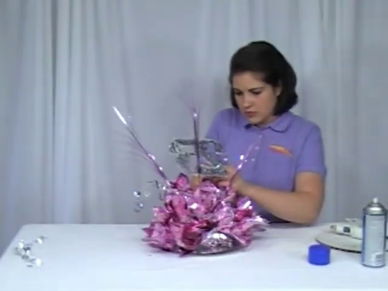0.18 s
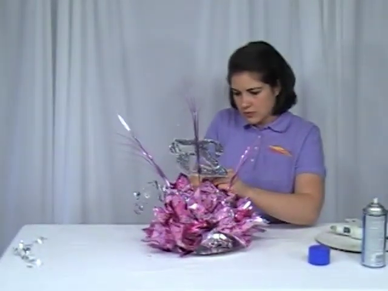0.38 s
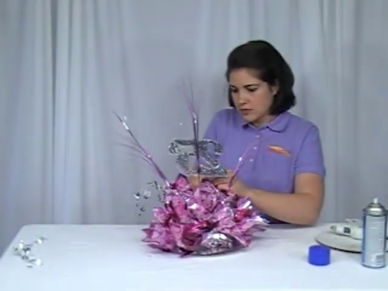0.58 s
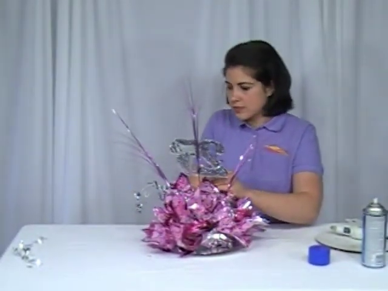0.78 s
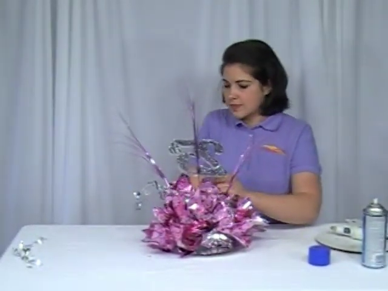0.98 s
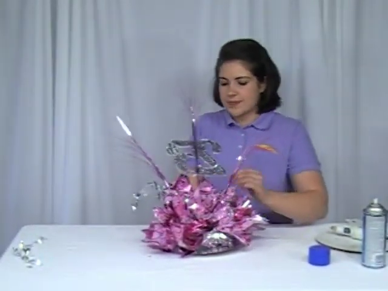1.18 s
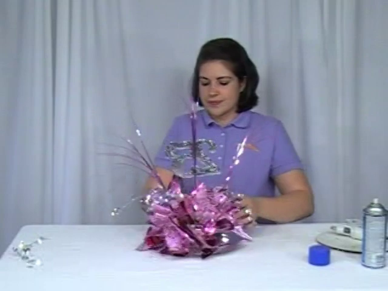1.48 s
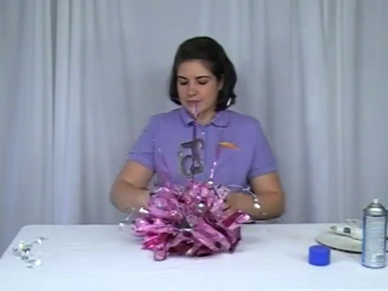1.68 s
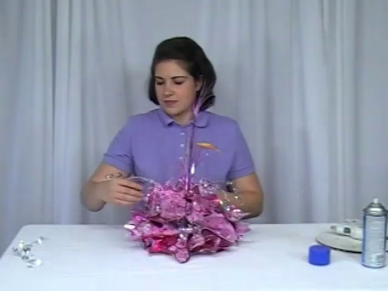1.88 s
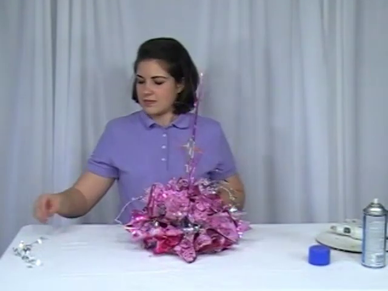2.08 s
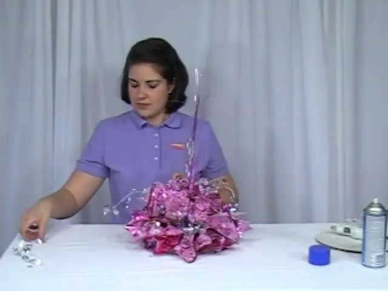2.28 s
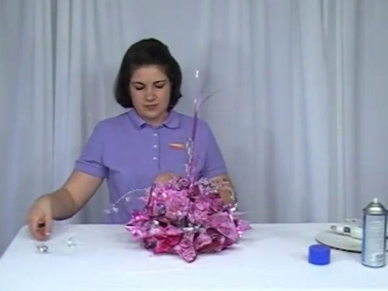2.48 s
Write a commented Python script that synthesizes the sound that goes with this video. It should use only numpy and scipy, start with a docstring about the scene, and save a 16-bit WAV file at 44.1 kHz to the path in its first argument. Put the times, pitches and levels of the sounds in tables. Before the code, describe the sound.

Foil and tinsel crinkle over soft room hiss: sharp snaps early, then scattered crackles, a dense bright burst midway, continued rustling, and finally a soft hand thump and tiny tick, heard in a live room.

```python
"""A faint foil rustle over a soft, wide background hiss of air and microphone comes first, then sprigs snap.
Hands work stiff tinsel sprigs into a foil centerpiece and turn it on a table: decaying cosine grains crinkle,
and larger creases pop as short pings with a sharp edge. Snaps are noise cracks over the damped modes of the base.
A hand then lands softly on the table and picks at a small ornament; both are sums of damped modes.
A live room adds near-wall echoes and a diffuse tail to every handled sound; faint ventilation tones run below."""
import sys
import numpy as np
from scipy import signal
from scipy.fft import rfft, irfft, next_fast_len
from scipy.io import wavfile
from scipy.ndimage import uniform_filter1d

SR = 44100
rng = np.random.default_rng(int(sys.argv[2]) if len(sys.argv) > 2 else 0)


def bounce(signal):
    """Save signal as a 16-bit WAV file at the path given by the first command-line argument."""
    frames = np.transpose(np.atleast_2d(signal))
    limited = np.clip(frames, -1, 1)
    pcm = np.round(limited * 32767).astype(np.int16)
    wavfile.write(sys.argv[1], SR, pcm)


N = 114660  # 2.6 s

# Background noise spectrum: frequency_hz, level_db
BACKGROUND_SPECTRUM = [(20, -21), (60, -15), (120, -14.5), (190, -6), (240, -4), (320, -5), (500, -3),
                       (1000, -7), (1400, -11), (4000, -21.5), (8000, -28), (12500, -33)]
# Stereo width of the background noise: frequency_hz, side_minus_mid_db
BACKGROUND_WIDTH = [(60, 5), (200, 8.5), (450, 9.5), (800, 3), (1500, 13), (4000, 28), (8000, 20)]
# Narrow ventilation tones: frequency_hz, level_db
VENT_TONES = [(241, -69.5), (961, -81), (1080, -70)]
BACKGROUND_DB = -53

# Reverberation time: frequency_hz, t60_s
ROOM_T60 = [(150, 0.4), (400, 0.97), (1500, 0.79), (4000, 0.91), (8000, 0.69), (12000, 0.76)]
# Stereo width of the room's answer: frequency_hz, side_minus_mid_db
ROOM_WIDTH = [(100, 3.5), (300, -5), (600, -6.5), (1000, -11), (1800, -24), (3500, -13), (5500, -14),
              (7000, -8.5), (8500, 0), (9800, -2), (12000, -7)]
# Channel balance of the whole scene: frequency_hz, right_minus_left_db
BALANCE = [(100, 1), (300, 1), (700, 0.5), (2500, 0), (5000, 0.5), (8000, 1.6), (12000, -0.5)]
# Tail and wall levels before each source's own wet level; build-up time constant of the tail
TAIL_DB, WALLS_DB, BUILD_S = 2, -3.5, 0.00033
TOP_HZ = 12550

# Touches of the small ornament, which then settles: start_s, level_db
TICKS = [(2.411, -31.5), (2.429, -40.5)]
# Modes of the ornament: frequency_hz, level_db, t60_s
ORNAMENT_MODES = [(1570, 1.5, 0.011), (1880, -8.5, 0.011), (5370, 9, 0.0026), (8040, 10, 0.0029),
                  (8700, 3.5, 0.0025)]
# The hand landing on the table, heel first, then palm and fingers: start_s, level_db
KNOCKS = [(2.229, -32.5), (2.239, -27), (2.279, -37.5)]
# Modes of the table: frequency_hz, level_db, t60_s
TABLE_MODES = [(103, -15.5, 0.11), (157, -11, 0.07), (217, -4.5, 0.05), (257, -1.5, 0.063),
               (288, 2.5, 0.044), (361, -1.5, 0.054), (451, -7, 0.045), (740, -6, 0.034), (1044, -9, 0.03)]

# Single large creases flipping: start_s, level_db, pitch_hz
POPS = [(0.0602, -41, 2430), (.161, -39, 8100), (0.4336, -39, 6240), (0.5058, -41, 6500),
        (0.5495, -40, 7200), (0.638, -34, 7750), (0.6405, -36, 7030), (.767, -30, 5630), (.782, -43, 7700),
        (.817, -37, 7700), (.846, -29, 5350), (0.876, -32, 1790), (0.9171, -24, 8200), (1.005, -34.5, 1940),
        (1.1573, -37.5, 6060), (1.2936, -32, 6900), (1.319, -30, 7800), (1.342, -22, 7200),
        (1.3602, -23.5, 6100), (1.3745, -21.5, 8200), (1.39, -21.5, 8500), (1.3915, -28.5, 1270),
        (1.4006, -25.5, 7140), (1.4092, -28.5, 6800), (1.4353, -23, 6900), (1.447, -28, 1990),
        (1.4614, -24.5, 6900), (1.5012, -22, 6850), (1.5632, -26.5, 7700), (1.6904, -29, 7760),
        (1.7955, -27.5, 1940), (1.812, -27, 2070), (1.903, -29, 2390), (1.9222, -28.5, 1870),
        (2.0655, -32.5, 5360), (2.1186, -32.5, 7340), (2.1259, -36.5, 5450)]
POP_CYCLES, POP_CRACK_DB = 2.13, 0  # cycles to decay by 1/e; edge level relative to the ping
POP_TILT_DB, POP_MID_HZ = 2, 5000  # edge tilt per octave of pitch; pitch with an untilted edge

# Sprigs snapping into the base, some in several quick contacts, and a nudge of the base at 1.83 s:
# start_s, crack_db, tilt_db_per_octave, thump_db
SNAPS = [(0.2344, -19, -1.5, -33), (0.236, -18, 2.5, -34), (0.2451, -24, -3, -36), (0.258, -26, -2, -35),
         (0.7702, -22.5, -1.4, -37.5), (0.9068, -17.5, 0.4, -35), (1.8289, -27.5, -2, -41),
         (2.1152, -28.5, -2.5, -54)]
# Modes of the base: frequency_hz, level_db, t60_s
BASE_MODES = [(183.8, 0.5, 0.37), (241.7, 7, 0.2), (277, 11, 0.094), (376.6, 7.5, 0.12), (419.7, 2, 0.33),
              (692, 0, 0.21)]
# Crack spectrum before tilt: frequency_hz, level_db
CRACK_SPECTRUM = [(20, -69), (100, -25), (300, -12), (900, -6), (1600, -0.5), (2600, 3.5), (3900, -1.5),
                  (5600, 1.5), (8200, 5), (10500, -5.5), (12500, -12)]
SNAP_DECAY_S = 0.0039

# Strength of handling over time: start_s, tinsel_level_db, leaves_level_db
HANDLING = [(0, -50, -52), (.16, -55, -55), (.22, -58, -63), (0.252, -33, -49), (.33, -57, -41.5),
            (.39, -87, -59.5), (.5, -56, -56), (0.539, -44, -50), (.63, -47.5, -56.5), (.68, -72, -56.5),
            (.76, -47, -57), (.78, -42.5, -49), (.84, -43, -49.5), (.88, -40, -45.5), (.97, -52, -50),
            (1.01, -39, -43), (1.05, -48.5, -55), (1.19, -55, -55), (1.3, -45.5, -52), (1.348, -33, -42),
            (1.45, -38.5, -47), (1.54, -40.5, -44), (1.65, -40, -44), (1.75, -37, -42), (1.78, -39.5, -43),
            (1.84, -34, -44.5), (1.88, -47, -47.5), (1.919, -40.5, -44.5), (1.96, -49.5, -65),
            (2.05, -41, -49.5), (2.1, -60, -54.5), (2.181, -54.5, -57), (2.33, -58.5, -56.5),
            (2.6, -62, -62.5)]
# Colour of the bright tinsel: frequency_hz, level_db
TINSEL_SPECTRUM = [(200, -26), (1500, -8), (3500, -10), (5000, -5.5), (6500, -2.5), (7800, -1.4),
                   (9200, -8), (10800, -16), (12500, -11.5)]
# Colour of the duller foil leaves: frequency_hz, level_db
LEAVES_SPECTRUM = [(80, -23.5), (250, -11.5), (500, -9.5), (800, -5), (1450, -3.5), (1950, -2.5),
                   (2800, -6.5), (4000, -12), (9000, -21.5)]
CREASES_PER_S, CREASE_SPREAD_DB, CREASE_DECAY_S = 900, 4.5, 0.00022
FLURRIES_PER_S, FLURRY_DB = 80, 3  # each flurry is raised or lowered by up to FLURRY_DB


def amp(db):
    """Level law: decibels to an amplitude gain."""
    return 10 ** (np.asarray(db) / 20)


def unit(x):
    """Power normalization: scale to rms 1."""
    return x / np.sqrt(np.mean(x ** 2) + 1e-20)


def blow(x):
    """Energy normalization: give a short sound the energy of a one-millisecond burst of rms 1."""
    return x * np.sqrt(SR / 1000 / np.sum(x ** 2))


def along(points, hz):
    """Logarithmic frequency scale: interpolate (Hz, value) points at the given frequencies."""
    point_hz, values = np.transpose(points)
    return np.interp(np.log(hz + 1), np.log(point_hz + 1), values)


def filtered(x, response):
    """Linear filtering: multiply the spectrum by a response of frequency."""
    length = next_fast_len(x.shape[-1] + SR // 4)
    spectrum = rfft(x, length) * response(np.fft.rfftfreq(length, 1 / SR))
    return irfft(spectrum, length)[..., :x.shape[-1]]


def coloured(x, points, tilt_db=0, size=2048):
    """Minimum phase: a folded cepstrum makes a causal filter from (Hz, dB) points and a tilt per octave."""
    hz = np.fft.rfftfreq(size, 1 / SR)
    level_db = along(points, hz) + tilt_db * np.log2(hz + 20)
    cepstrum = irfft(np.log(amp(level_db)))
    cepstrum[1:size // 2] *= 2
    cepstrum[size // 2 + 1:] = 0
    impulse = irfft(np.exp(rfft(cepstrum)))
    return signal.fftconvolve(x, impulse)[:len(x)]


def widened(pair, width):
    """Diffuse field: two unrelated signals serve as mid and side of a stereo pair."""
    def mid_side_gains(hz):
        angle = np.arctan(amp(along(width, hz)))
        return np.array([np.cos(angle), np.sin(angle)])

    mid, side = filtered(pair, mid_side_gains)
    return np.array([mid + side, mid - side])


def add(track, start_s, x):
    """Superposition: mix x into the track from the given time."""
    part = track[..., round(start_s * SR):][..., :x.shape[-1]]
    part += x[..., :part.shape[-1]]


def even(x, size=2200):
    """Running power normalization: steady the level over about 50 ms so that single crackles stand out."""
    return x / np.sqrt(np.abs(uniform_filter1d(x ** 2, size)) + 1e-20)


def ring(modes, radiate_hz=150, attack_s=0.0016):
    """Modal vibration: one blow excites damped modes, and the deepest bass is radiated poorly."""
    t = np.arange(SR // 3) / SR
    modal_sum = sum(amp(db - 60 * t / t60_s) * np.sin(2 * np.pi * hz * t) for hz, db, t60_s in modes)
    struck = modal_sum * (1 - np.exp(-t / attack_s))
    radiation = signal.butter(2, radiate_hz, "high", fs=SR, output="sos")
    return blow(signal.sosfilt(radiation, struck))


def crack(tilt_db, splinter_db=-19):
    """Impulsive fracture: one sharp pulse with a short, decaying noise tail."""
    t = np.arange(SR // 20) / SR
    burst = amp(splinter_db) * rng.standard_normal(len(t)) * np.exp(-t / SNAP_DECAY_S)
    burst[0] = 1
    return blow(coloured(burst, CRACK_SPECTRUM, tilt_db))


def diffuse_tail():
    """Reverberant decay: two channels of noise lose 60 dB in the t60 of each frequency."""
    noise = rng.standard_normal((2, SR * 3 // 4))
    hz, frame_s, spectrum = signal.stft(noise, SR, nperseg=256)
    decay = amp(-60 * frame_s / along(ROOM_T60, hz)[:, None])
    tail = signal.istft(spectrum * decay, SR, nperseg=256)[1]
    t = np.arange(tail.shape[1]) / SR
    return tail * (1 - np.exp(-t / BUILD_S))


def room(x, wet_db=0, count=16):
    """Room impulse response: direct sound, near-wall echoes at 2 to 24 ms and a diffuse tail."""
    tail = diffuse_tail()
    walls = np.zeros_like(tail)
    for channel in walls:
        delay_s = .002 + .022 * rng.random(count)
        channel[(SR * delay_s).astype(int)] = rng.choice([-1, 1], count) / np.sqrt(count)
    reflections = amp(TAIL_DB) * tail / np.linalg.norm(tail[0]) + amp(WALLS_DB) * walls
    answer = amp(wet_db) * widened(reflections, ROOM_WIDTH)
    answer[:, 0] += 1  # direct sound
    return signal.fftconvolve(x[None], answer / np.linalg.norm(answer[0]), axes=1)


def moving(x, count=26):
    """Changing echo paths: as the piece shifts and turns, each tenth of a second gets a new room response."""
    out, hop = np.zeros((2, N)), N // count
    for start in range(0, N, hop):
        add(out, start / SR, room(x[start:start + hop], wet_db=-1.5))
    return out


def vent_tone(hz, width_hz=6):
    """Narrow-band resonance: noise through a narrow peak wavers around one pitch."""
    return unit(filtered(rng.standard_normal(N), lambda f: 1 / (1 + ((f - hz) / width_hz) ** 2)))


def background():
    """Stationary noise: steady, wide background noise with a few narrow ventilation tones in the middle."""
    noise = filtered(rng.standard_normal((2, N)), lambda hz: amp(along(BACKGROUND_SPECTRUM, hz)))
    hiss = unit(widened(noise, BACKGROUND_WIDTH))
    tones = sum(amp(db) * vent_tone(hz) for hz, db in VENT_TONES)
    return amp(BACKGROUND_DB) * hiss + tones


def ornament_ticks():
    """Small-body resonance: fingers excite the ornament's high, strongly damped modes."""
    out = np.zeros((2, N))
    for start_s, level_db in TICKS:
        tick = amp(level_db) * ring(ORNAMENT_MODES, attack_s=0.00023)
        add(out, start_s, room(tick, wet_db=-0.5))
    return out


def knocks():
    """Damped panel modes: the hand meets the cloth-covered table in dull thumps that fade in the room."""
    out = np.zeros((2, N))
    for start_s, level_db in KNOCKS:
        thump = amp(level_db) * ring(TABLE_MODES, radiate_hz=112, attack_s=.002)
        add(out, start_s, room(thump, wet_db=5))
    return out


def pops():
    """Snap-through buckling: a crease flips with a click and brief ring; low creases are duller and longer."""
    out, t = np.zeros((2, N)), np.arange(SR // 20) / SR
    for start_s, level_db, pitch_hz in POPS:
        fade = np.exp(-t * pitch_hz / POP_CYCLES)
        motion = fade * (1 - fade ** 4) * np.sin(2 * np.pi * pitch_hz * t)
        ping = np.diff(motion, prepend=0)
        edge = crack(tilt_db=POP_TILT_DB * np.log2(pitch_hz / POP_MID_HZ), splinter_db=-19.5)
        pop = blow(blow(ping) + amp(POP_CRACK_DB) * edge)
        add(out, start_s, room(amp(level_db) * pop, wet_db=-1))
    return out


def snaps():
    """Impulse excitation: each contact of sprig and base, or nudge, is a broad crack over the base's modes."""
    out = np.zeros((2, N))
    for start_s, crack_db, tilt_db, thump_db in SNAPS:
        contact = amp(thump_db) * ring(BASE_MODES)
        add(contact, 0, amp(crack_db) * crack(tilt_db))
        add(out, start_s, room(contact))
    return out


def creases(lo_hz, hi_hz, count=9000, size=96):
    """Random buckling: tiny damped grains, each with its own time, size and pitch, come in short flurries."""
    when, pitch, phase, keep = rng.random((count, 4)).T[:, :, None]  # when is a fraction of the scene
    flurries = rng.uniform(-1, 1, count)
    flurry_db = FLURRY_DB * flurries[(when * N / SR * FLURRIES_PER_S).astype(int)]
    size_db = CREASE_SPREAD_DB * np.minimum(rng.exponential(size=(count, 1)), 2.4)
    kept = keep < CREASES_PER_S * N / SR / count  # thins the draws to the mean crease rate
    gain = amp(size_db + flurry_db) * kept
    t = np.arange(size) / SR
    pitch_hz = lo_hz + (hi_hz - lo_hz) * pitch
    grains = gain * np.exp(-t / CREASE_DECAY_S) * np.cos(2 * np.pi * (pitch_hz * t + phase))
    positions = (when * N).astype(int) + np.arange(size)
    return np.bincount(positions.ravel(), grains.ravel())[:N]


def crinkle():
    """Crackling noise: tinsel and foil leaves crease as strongly as they are handled."""
    start_s, tinsel_db, leaves_db = np.transpose(HANDLING)
    t = np.arange(N) / SR
    tinsel = even(coloured(creases(2240, 11380), TINSEL_SPECTRUM))
    leaves = even(coloured(creases(550, 5900), LEAVES_SPECTRUM))
    tinsel_gain = amp(np.interp(t, start_s, tinsel_db))
    leaves_gain = amp(np.interp(t, start_s, leaves_db))
    return tinsel_gain * tinsel + leaves_gain * leaves


def scene():
    """Superposition of sources: all layers sum, with a balance that leans slightly right over most of the band."""
    handled = ornament_ticks() + knocks() + pops() + snaps() + moving(crinkle())
    return filtered(background() + handled, lambda hz: amp(np.outer([-.5, .5], along(BALANCE, hz))))


def record(dry):
    """Band limitation: a very steep low-pass removes the sound above TOP_HZ."""
    return filtered(dry, lambda hz: 1 / np.sqrt(1 + (hz / TOP_HZ) ** 300))


dry = scene()
out = record(dry)
bounce(out)
```